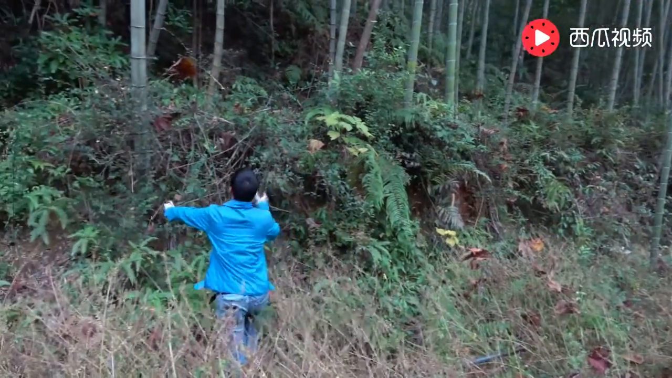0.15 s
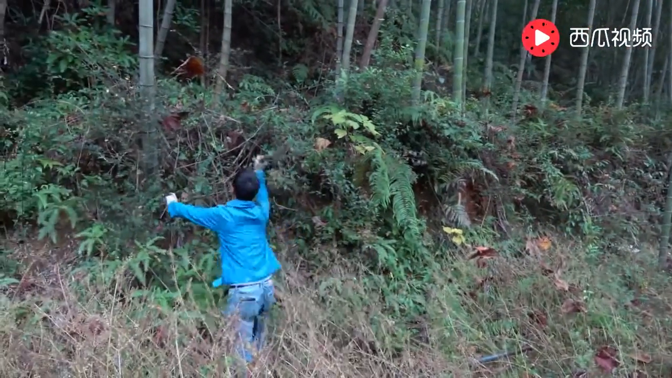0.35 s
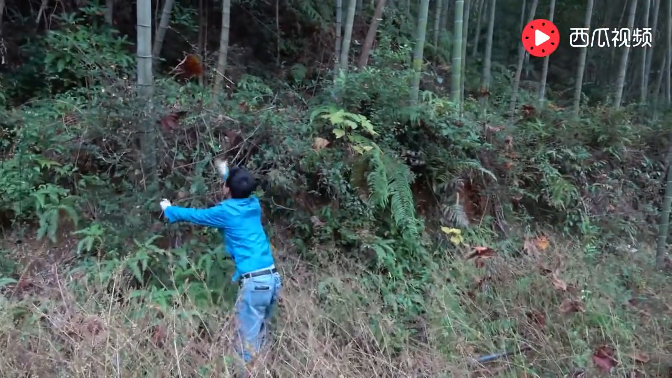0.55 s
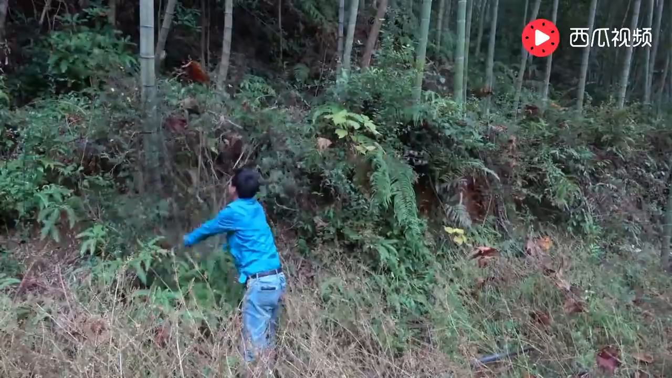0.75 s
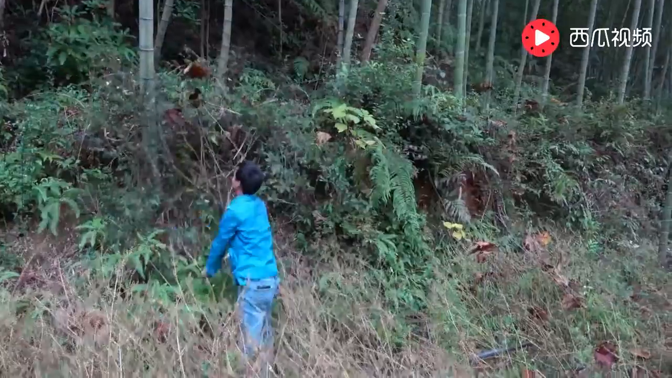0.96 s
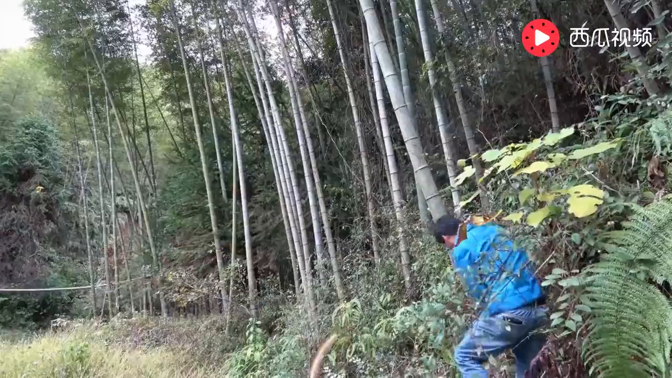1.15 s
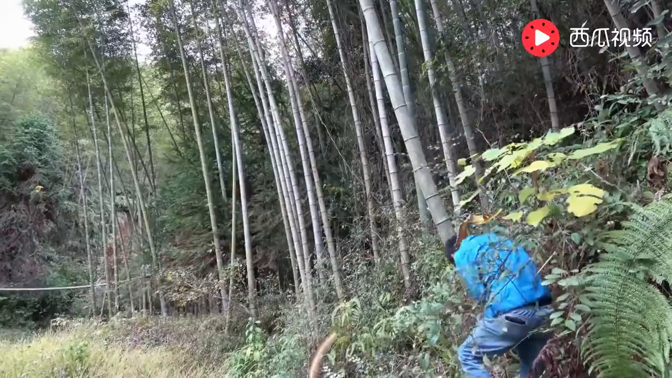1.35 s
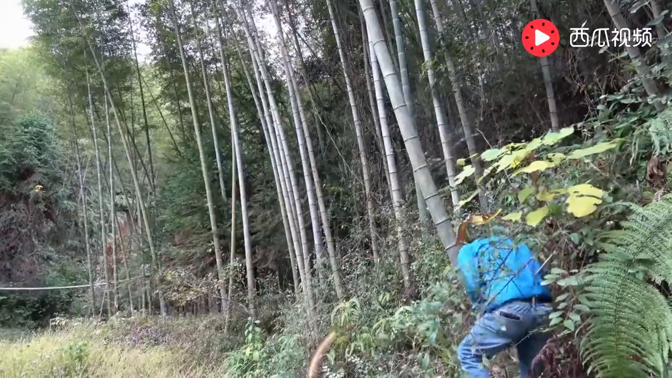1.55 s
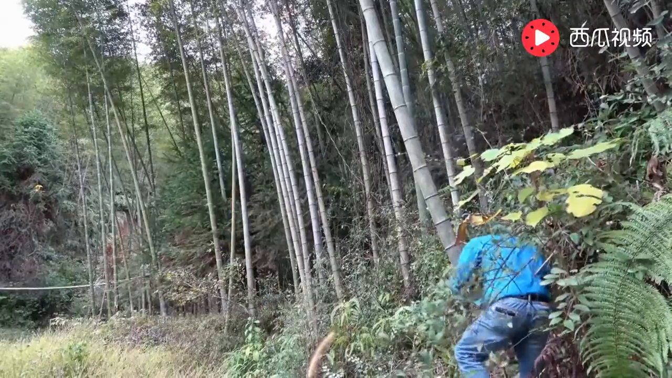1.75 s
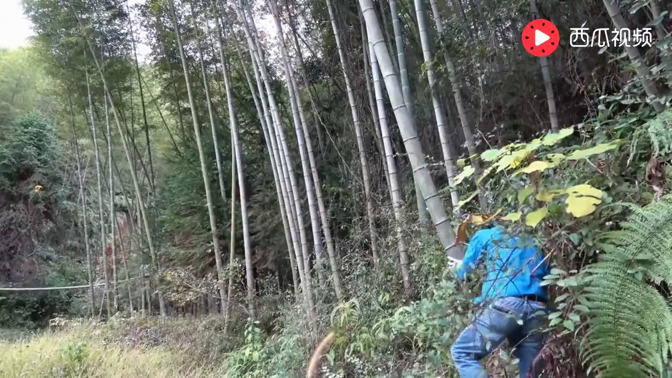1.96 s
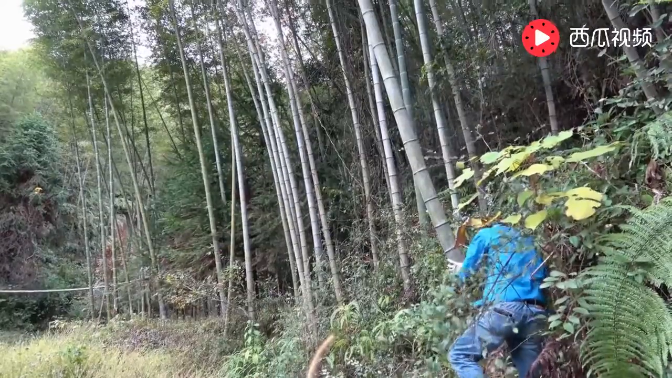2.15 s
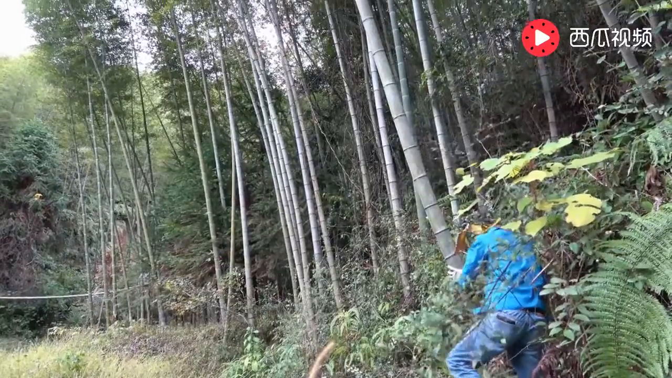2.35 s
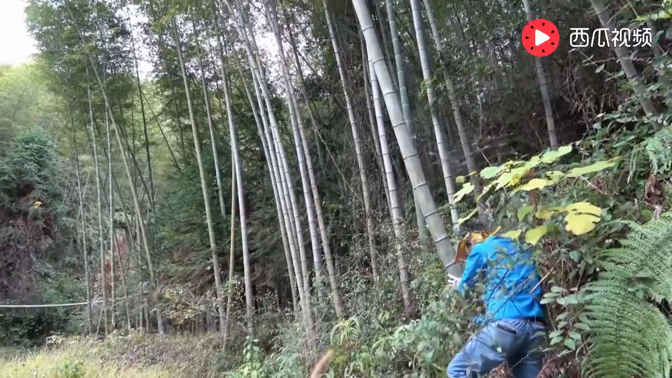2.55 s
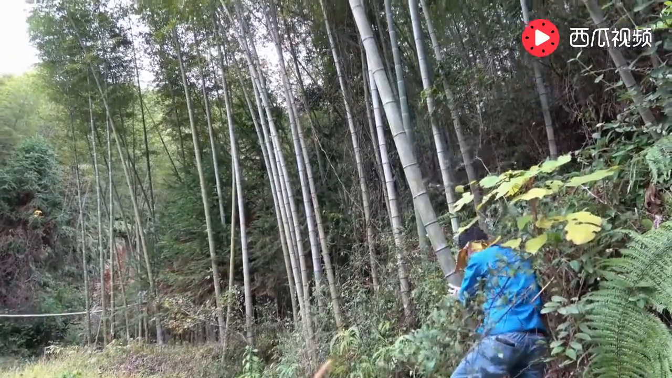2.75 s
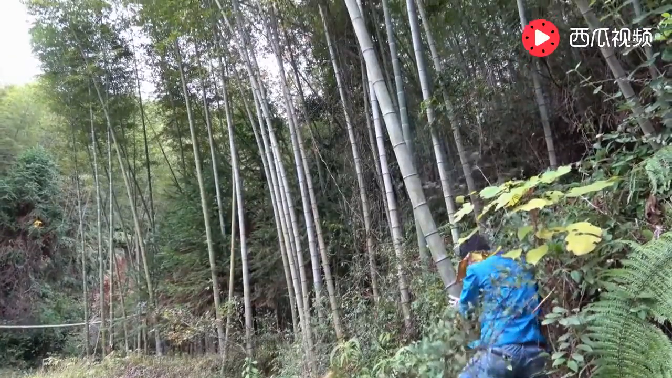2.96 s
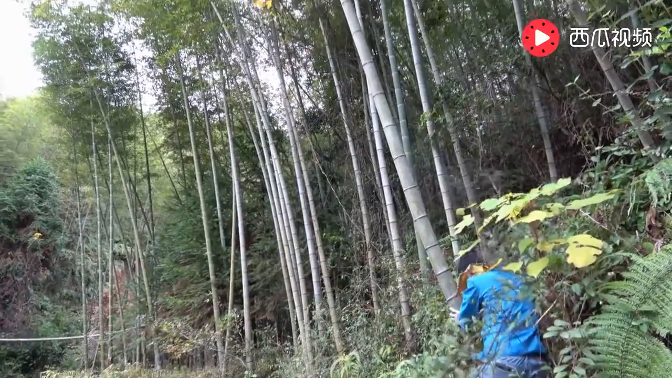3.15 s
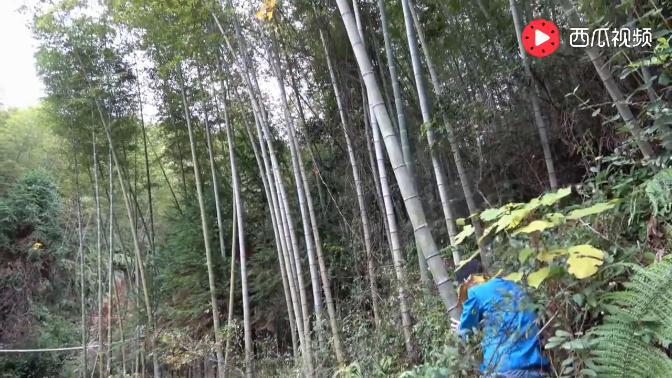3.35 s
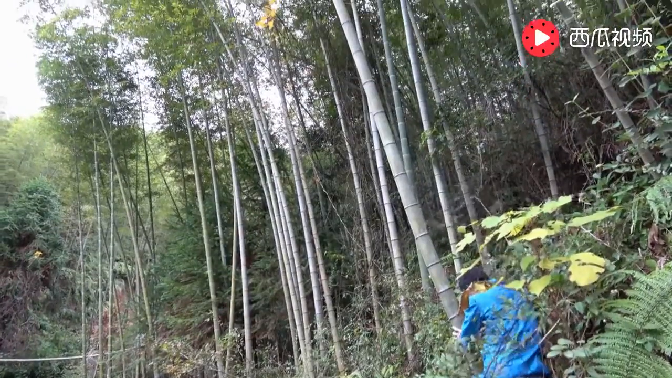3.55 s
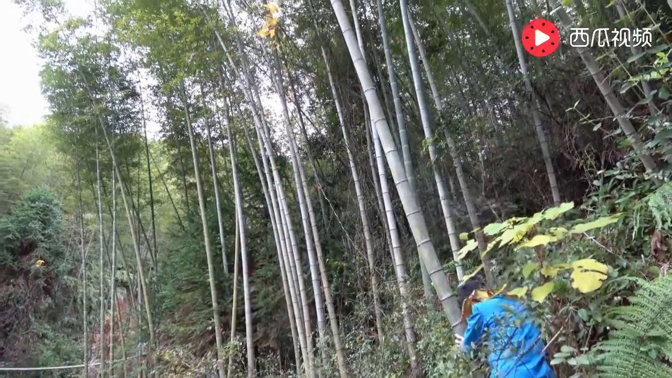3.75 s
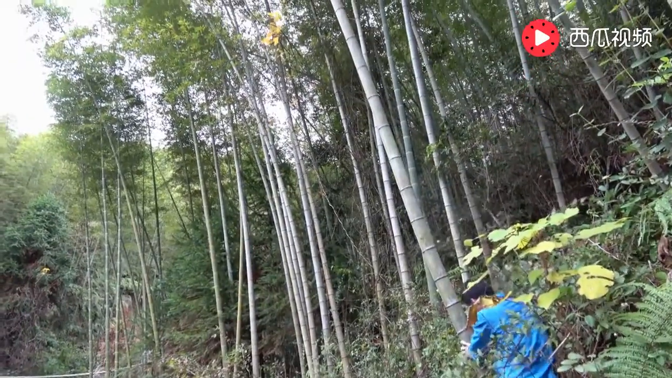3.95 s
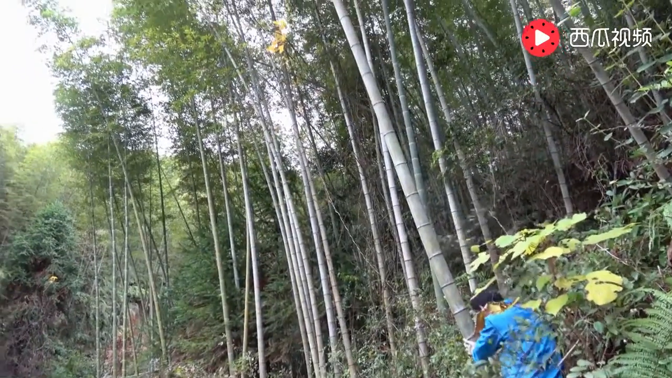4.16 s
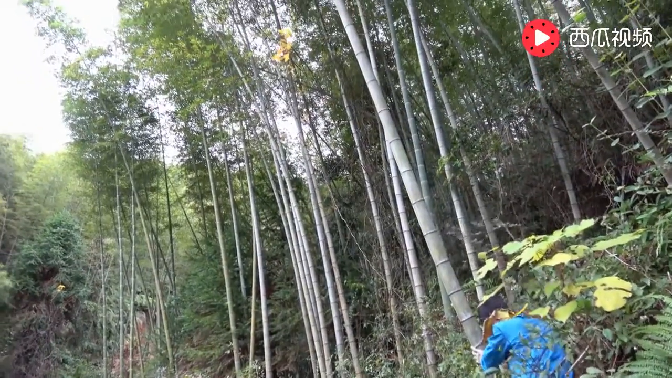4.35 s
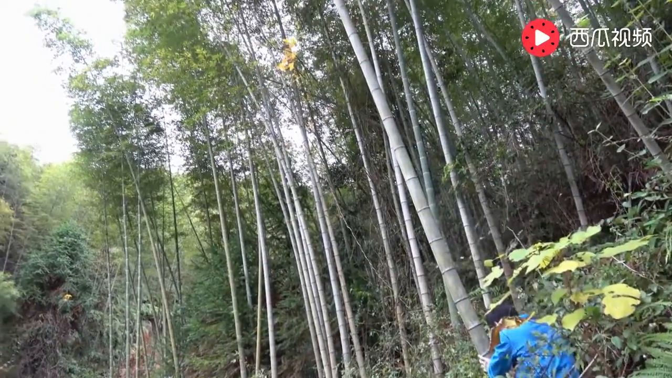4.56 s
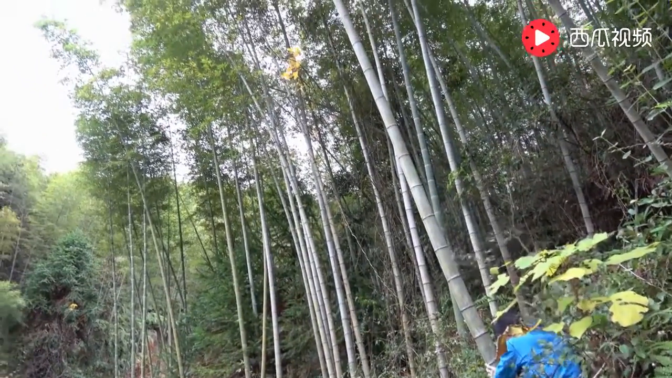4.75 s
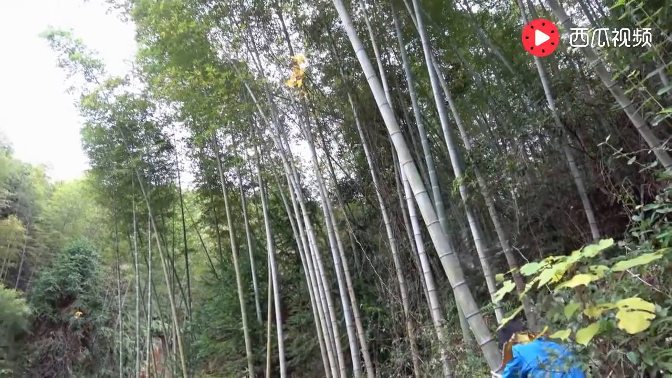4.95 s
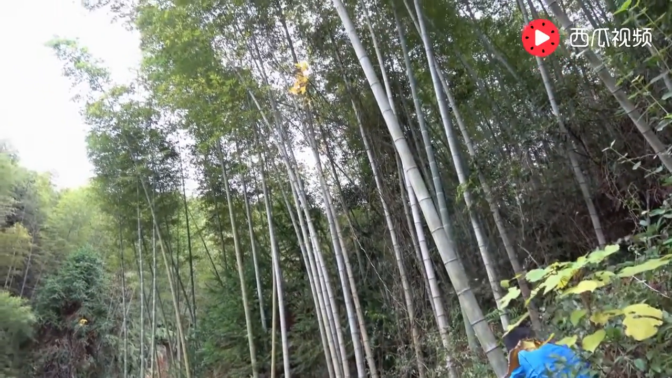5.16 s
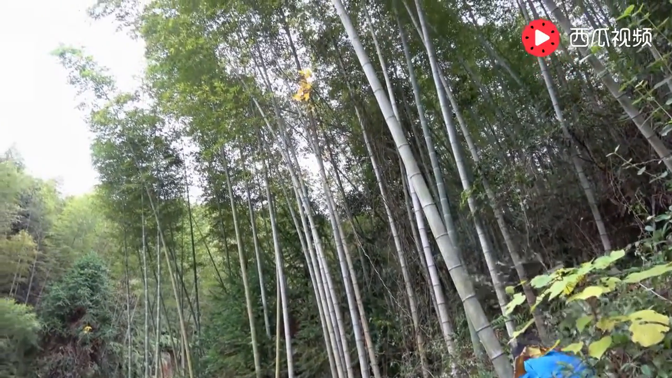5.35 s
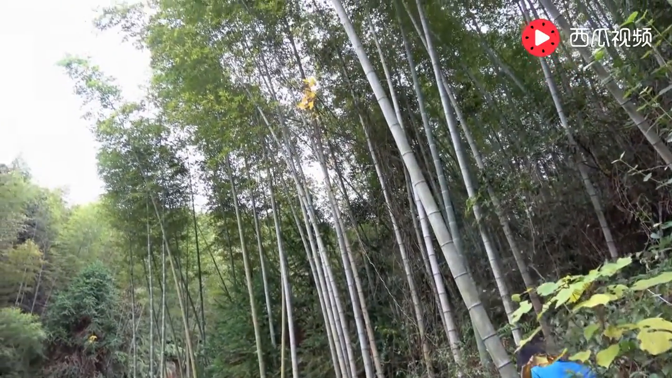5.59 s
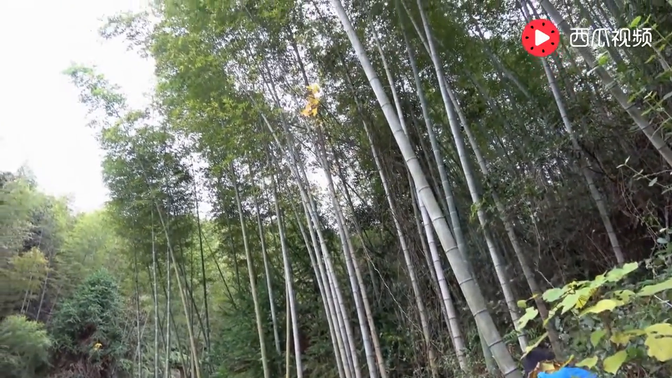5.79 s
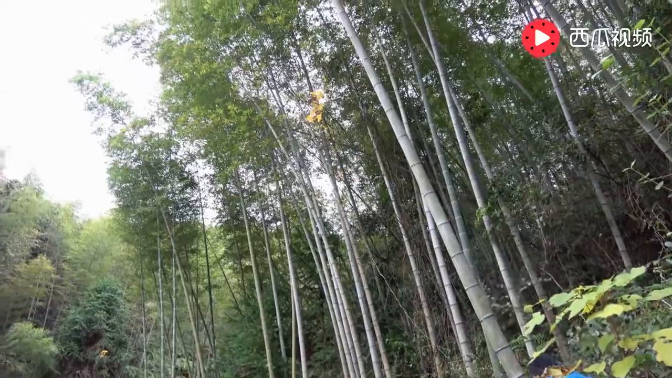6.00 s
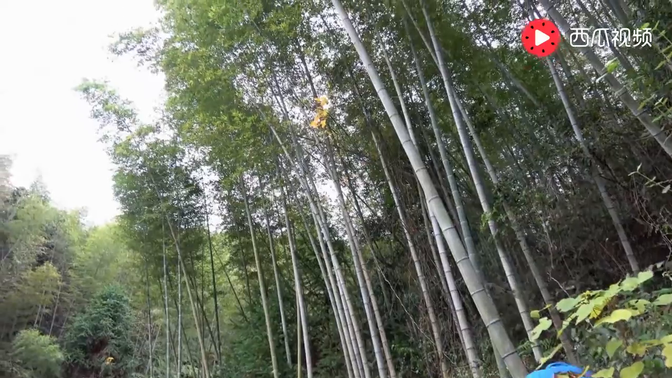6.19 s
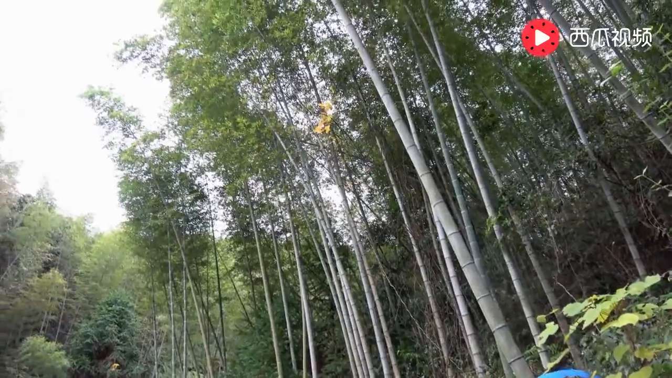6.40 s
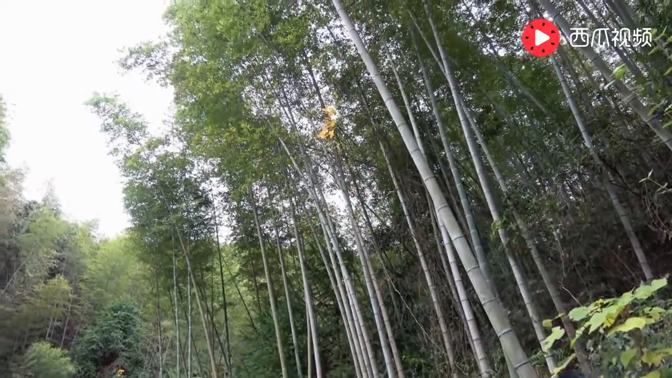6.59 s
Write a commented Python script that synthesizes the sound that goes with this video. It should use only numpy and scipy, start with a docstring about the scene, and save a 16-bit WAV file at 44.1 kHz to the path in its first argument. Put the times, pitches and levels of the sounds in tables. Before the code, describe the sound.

A blade slashes through brush and snaps twigs, then chops a hollow bamboo stem with sharp, evenly spaced knocks as leaves rustle.

```python
"""A thick bamboo stem is chopped in a grove. Each blow crunches the fibres, thumps, rings the hollow
stem and shakes the leaves and branches. Before the chopping, a blade slashes through brush and snaps
twigs, and the level dips briefly at about one second. Twigs keep ticking, the stems around echo the hits,
and at last the leafy top starts to swish down. A far rumble and a thin leaf hiss lie under it all."""
import sys
import numpy as np
from scipy import signal
from scipy.fft import rfft, irfft, next_fast_len
from scipy.io import wavfile
from scipy.ndimage import uniform_filter1d, map_coordinates

SR = 44100
rng = np.random.default_rng(int(sys.argv[2]) if len(sys.argv) > 2 else 0)


def generate_wav(sig):
    """Save sig (samples, or channels by samples) to the path in sys.argv[1] as 16-bit PCM at SR."""
    pcm = np.round(np.clip(np.atleast_2d(sig).T, -1, 1) * 32767).astype(np.int16)
    wavfile.write(sys.argv[1], SR, pcm)


N = 292383

# Blows on the stem: start_s, level_db, thump_db, note_db, note_delay_s, note_hz, shake_db, rattle_db,
# stir_db. Thump, note, shake and rattle are relative to level_db.
BLOWS = [(2.7732, -6.5, -2.5, -0.5, 0.025, 589, -26, -25, -33),
         (3.3526, -4, -10, -10.5, 0.026, 620.6, -23.5, -32, -40.5),
         (3.395, -17.5, 4.5, -4.5, 0.012, 525, -28.5, -43, -43),
         (3.893, -11, -3, -4, 0.019, 658, -11.5, -25, -39),
         (3.9356, -10.5, 1.5, -4.5, 0.022, 546, -24, -34, -34),
         (4.4714, -5, -6.5, -5, 0.0265, 564, -20, -30, -38.5),
         (5.015, -6, -11, -7.5, 0.021, 636, -14.5, -27.5, -37),
         (5.5691, -6, -6.5, -8.5, 0.025, 579, -19, -32.5, -44)]
# Steady stir of the brush: time_s, level_db, dryness_db (more is brighter), pan_db (left minus right)
BRUSH_STIR = [(0, -56.5, 0.5, -0.5), (.55, -48, 0.5, 2), (.68, -60, -4, -5), (.74, -55, 6, 0.5),
              (1.25, -54.5, -2, -2.5), (1.45, -48.5, -0.5, -4), (2.05, -50, -2, -3.5),
              (2.5, -51.5, -2, -3.5), (2.72, -52.5, -1, -4), (3.25, -50.5, -1, -4.5),
              (3.62, -42.5, 1.5, -1.5), (4.25, -46, .5, -4.5), (5.3, -43.5, 1, -2.5), (5.97, -46, 0, -3),
              (5.995, -56.5, 0, -7), (6.2, -45, 0, -8), (6.4, -36, -1, -8), (6.52, -34, 1.5, -8.5),
              (6.63, -39, 0, -8)]
# Tone of rustling leaves: pitch_hz, level_db
LEAF_TONE = [(88, -25), (150, -5), (303, -5.5), (398, -3), (649, -4), (871, -3), (1870, -4), (3490, -5.5),
             (9260, -10.5), (13400, -21), (16000, -28)]


def amp(db):
    """Turns decibels into a gain."""
    return 10 ** (np.asarray(db) / 20)


def unit(x):
    """Scales a signal to an average power of 1."""
    return x / np.sqrt(np.mean(x ** 2) + 1e-20)


def along(points, hz):
    """Reads between (pitch_hz, value) points on a log pitch axis."""
    pitches, values = np.transpose(points)
    return np.interp(np.log(hz + 1), np.log(pitches + 1), values)


def curves(rows):
    """One value per sample for each column after the time."""
    times, *columns = np.transpose(rows)
    return [np.interp(np.arange(N) / SR, times, column) for column in columns]


def wobble(rate):
    """A smooth random curve through rate points a second."""
    return map_coordinates(rng.standard_normal(int(N * rate / SR) + 4), [np.arange(N) * rate / SR])


def clumps(t, rate, depth_db):
    """A jerky gain, rate steps a second, for crunching and rattling."""
    steps = rng.standard_normal(int(len(t) * rate / SR) + 2)
    return unit(amp(depth_db * np.interp(t * rate, np.arange(len(steps)), steps)))


def filtered(x, response):
    """Gives each frequency the gain response(hz)."""
    n = x.shape[-1]
    padded = next_fast_len(n + 8192)
    return irfft(rfft(x, padded) * response(np.fft.rfftfreq(padded, 1 / SR)), padded)[..., :n]


def sides(pan_db):
    """Left and right gains for a level difference."""
    return np.array([amp(pan_db / 2), amp(-pan_db / 2)])


def add(track, start_s, sound):
    """Mixes a sound into a track."""
    i = round(start_s * SR)
    track[..., i:i + sound.shape[-1]] += sound[..., :track.shape[-1] - i]


def puff(t, tone):
    """Noise as long as t, shaped by (pitch_hz, level_db) points."""
    return unit(filtered(rng.standard_normal(len(t)), lambda hz: amp(along(tone, hz))))


def spread(pair, tone):
    """Blends two unrelated noises into stereo with the given tone."""
    # How alike left and right are: pitch_hz, likeness (1 is the same)
    alike = [(60, 0.99), (240, 0.86), (950, 0.94), (3770, 1), (15000, 0.69)]
    turn = lambda hz: np.arccos(np.clip(along(alike, hz), -1, 1)) / 2
    mid, side = filtered(pair, lambda hz: amp(along(tone, hz)) * [np.cos(turn(hz)), np.sin(turn(hz))])
    return unit(np.array([mid + side, mid - side]))


def rumble():
    """Far low noise in slow lumps, swelling a moment after each blow."""
    # Tone of the rumble: pitch_hz, level_db
    tone = [(12, -43), (20, -23.5), (114, 0), (219, -10.5), (369, -16), (422, -15.5), (560, -22),
            (700, -15), (910, -32), (1540, -120)]
    t, late_s, width_s = np.arange(N) / SR, 0.093, 0.074
    swell = np.max([np.exp(-.5 * ((t - blow[0] - late_s) / width_s) ** 2) for blow in BLOWS], axis=0)
    level_db = -50.5 + 5 * swell + 1.6 * wobble(2.56) + 3.55 * wobble(24)
    return amp(level_db) * spread(rng.standard_normal((2, N)), tone)


def brush_motion():
    """Level, dryness and pan of all the moving brush; louder rustles count for more."""
    # Single rustles: time_s, peak_db, rise_s, hold_s, fall_s, dryness_db, pan_db (rise and fall: 20 dB)
    rustles = [(0.203, -36, 0.41, .03, 0.37, 0.5, 1), (0.261, -33, .08, 0.048, 0.11, 5, -1),
               (0.383, -34, .15, .05, 0.13, -1.5, 0.5), (.768, -20, 0.01, 0.015, 0.12, 2.5, 0.5),
               (.835, -20.5, 0.1, 0.053, 0.042, 1, 0), (0.913, -31.5, .04, 0.096, 0.057, 1.5, 2),
               (1.058, -44.5, .03, .01, 0.25, -1.5, 3), (1.64, -40, 0.036, 0.009, 0.53, 1.5, -4),
               (2.173, -46, .15, 0.1, .15, 0, -5.5), (2.737, -31.5, .02, 0.022, .1, -1, -2),
               (3.025, -44, 0.034, 0.17, .2, 3.5, 0), (4.727, -43, 0.036, 0.016, 0.18, 1, 2)]
    # The arm swings through brush into a blow: peak_db, rise_s, hold_s, fall_s, dryness_db, pan_db
    swing = (-42, 0.26, 0.044, 0.07, 0.1, -8.5)
    # Brush stirred by a blow: rise_s, hold_s, fall_s, dryness_db, pan_db
    stir = (0.048, 0.048, 0.28, -1.4, 0.19)
    swings = [(blow[0], *swing) for before, blow in zip(BLOWS, BLOWS[1:]) if blow[0] - before[0] > .3]
    stirs = [(blow[0], blow[-1], *stir) for blow in BLOWS]
    t = np.arange(N) / SR
    level_db, dry_db, pan_db = curves(BRUSH_STIR)
    power = amp(2 * level_db)
    dry_sum, pan_sum = power * dry_db, power * pan_db
    for time_s, peak_db, rise, hold, fall, dryness, pan in rustles + swings + stirs:
        drop_db = 20 * np.maximum(0, np.maximum((time_s - t) / rise, (t - time_s - hold) / fall))
        part = amp(2 * (peak_db - drop_db))
        power, dry_sum, pan_sum = power + part, dry_sum + part * dryness, pan_sum + part * pan
    return 10 * np.log10(power), dry_sum / power, pan_sum / power


def leaves():
    """Patchy hiss with a crackle of single leaves in clumps; dry leaves sound brighter."""
    level_db, dry_db, pan_db = brush_motion()
    bands = signal.stft(rng.standard_normal((2, N)), nperseg=256)[2]
    patches = uniform_filter1d(uniform_filter1d(rng.standard_normal(bands.shape[1:]), 6, 0), 10, 1)
    hiss = unit(signal.istft(bands * amp(2 * unit(patches)), nperseg=256)[1][:, :N])
    flicks = (rng.random((2, N)) < .02 * amp(3.5 * wobble(25))) * rng.standard_normal((2, N))
    crackle = unit(flicks * amp(5.8 * rng.exponential(size=(2, N)).clip(0, 2.5)))
    rustle = spread(hiss + 0.3 * crackle, LEAF_TONE)
    low = filtered(rustle, lambda hz: 1 / (1 + (hz / 1800) ** 2))
    high = filtered(rustle, lambda hz: 1 - 1 / (1 + (hz / 7000) ** 2))
    tilted = amp(-2 * dry_db) * low + (rustle - low - high) + amp(2 * dry_db) * high
    return amp(level_db + .8 * wobble(30)) * sides(pan_db) * tilted


def grove_echo(hits):
    """Stems all round scatter the hits back, with a new echo every third of a second."""
    # Echoes among the stems: pitch_hz, fade_s (time to drop 60 dB)
    fades = [(200, 0.25), (1500, 0.17), (5000, 0.24), (12000, 0.16)]
    out, step = np.zeros((2, N)), SR // 3
    for i in range(0, N, step):
        hz, t, bands = signal.stft(rng.standard_normal((2, SR // 2)), SR, nperseg=256)
        tail = signal.istft(bands * amp(-60 * t / along(fades, hz)[:, None]), SR, nperseg=256)[1]
        tail = tail[:1] + 0.2 * tail * [[1], [-1]]  # nearly the same on both sides
        tail /= np.linalg.norm(tail[1])
        add(out, i / SR + .02, signal.fftconvolve(hits[None, i:i + step], tail, axes=1))
    return out


def twig_snaps():
    """Each twig gives a dry crack, a spray of splinters, a short ring and a duller knock."""
    # Twig snaps and blade ticks: start_s, level_db, pitch_hz, ring_db, knock_db
    snaps = [(0.0447, -23, 2586, -21, -24), (0.092, -24, 3080, -15, -28), (0.137, -25.5, 10200, -1.5, -32),
             (0.2143, -12.5, 4430, -5.5, -8.5), (0.3084, -10, 2750, -10, -15.5),
             (0.3211, -22.5, 1484, -21, -3.5), (0.382, -11.5, 8800, -13, -25),
             (0.4162, -13.5, 2950, -11, -5.5), (0.4461, -11.5, 1340, -10.5, -6.5),
             (0.4907, -21.5, 1440, -13, -10), (0.74, -10, 5800, 0, -39), (0.767, -13.5, 3010, -6, -36),
             (0.8783, -12.5, 3400, -9, -15), (0.889, -17, 3350, -8, -36), (0.9502, -20, 2500, -6.5, -23),
             (0.9801, -11.5, 1398, -8.5, -15), (1.3474, -24, 2880, -16, -39),
             (1.466, -16, 2190, -13.5, -14.5), (1.646, -20.5, 3960, -5.5, -40.5),
             (1.9616, -32, 1730, -3.5, -37), (2.206, -28, 1420, -7, -22), (2.7265, -14, 2840, -4, -48),
             (3.011, -22, 4040, -8, -25), (3.0293, -28, 1738, -9, -24.5), (3.0834, -26, 1515, -9, -31),
             (3.109, -28.5, 1580, -4, -31), (3.169, -17.5, 1530, 2, -42), (3.584, -25.5, 2620, -10, -14),
             (3.8778, -14, 3580, -7, -28), (3.8931, -4.5, 1510, -7.5, -34), (4.0244, -18, 1980, -5.5, -24),
             (4.4024, -24, 2240, -7, -14), (4.7208, -29, 3070, -5, -26), (4.947, -23.5, 3250, -8, -27),
             (5.2994, -26, 2850, -13, -29), (5.766, -29, 1510, -5, -18), (5.8202, -27.5, 2200, -10, -3.5),
             (5.879, -31.5, 1450, -8, -8), (6.5108, -22.5, 3450, -8, -16), (6.562, -14, 7960, -2, -40)]
    faint_ticks = [(when * N / SR, -32.5 - 6 * size, 1340 * 4 ** pitch ** 2, -7, -18)
                   for when, size, pitch in rng.random((18, 3))]
    out, t = np.zeros((2, N)), np.arange(SR // 5) / SR
    attack, fall = 1 - np.exp(-t / 0.00028), amp(-60 * t / .05)
    brush_pan_db = curves(BRUSH_STIR)[2]
    for start_s, level_db, hz, ring_db, knock_db in snaps + faint_ticks:
        pan_db = brush_pan_db[int(start_s * SR)] + 2.5 * rng.standard_normal()
        crack_tone = [(hz / 4, -30), (hz / 3.8, -3), (hz, 0), (hz * 1.94, -3), (hz * 5, -16)]
        crack = puff(t, crack_tone) * amp(-5 - 60 * t / 0.012)
        spray = puff(t, LEAF_TONE) * amp(-12) * fall
        tone = np.sin(2 * np.pi * hz * t) + .8 * np.sin(2 * np.pi * min(1.95 * hz, hz + 1400) * t)
        ring = amp(ring_db - 60 * t * hz / 200) * fall * tone  # thin twigs ring higher and shorter
        knock = amp(knock_db) * fall * puff(t, [(300, -23.5), (520, 2), (850, -4.5), (1500, -24)])
        snap = attack * (crack + spray + ring + knock)
        add(out, start_s, amp(level_db) * sides(pan_db)[:, None] * snap)
    return out


def branch_rattle(t):
    """Branches knock together just after a blow, in stereo."""
    # Ringing of the branches: pitch_hz, width_hz, level_db
    rings = [(584, 72, -13), (748, 79, -2), (1224, 160, -4), (1620, 210, 0.5), (2180, 440, -7.5),
             (2960, 1100, -9), (3800, 63, -8), (4910, 190, -9), (6500, 410, -15)]
    response = lambda f: sum(amp(db) / (1 + (2 * (f - hz) / width) ** 2) for hz, width, db in rings)
    swell = (t / 0.19) * np.exp(1 - t / 0.11) * clumps(t, 60.1, depth_db=4)
    mid, side = unit(filtered(rng.standard_normal((2, len(t))), response))
    return swell * np.array([mid + 0.068 * side, mid - 0.044 * side])


def leaf_shake(t):
    """A blow makes the leafy top shiver."""
    # Tone of the shaken top: pitch_hz, level_db
    tone = [(530, -38), (900, -12), (1550, -11), (1810, -8.5), (2660, 1.5), (3510, -3.5), (6330, -0.5),
            (13400, -14), (16000, -28)]
    shiver = (t / 0.036) ** 0.27 * np.exp(-(t / 0.067) ** 1.32) * clumps(t, 198, depth_db=2)
    return shiver * puff(t, tone)


def hollow_note(t, note_hz, delay_s):
    """A note runs back along the hollow stem, high pitches mostly first."""
    # Parts of the note: pitch_ratio (times note_hz), delay_ratio (times delay_s), level_db, width_s
    parts = [(1.32, 0.95, -13.5, 0.0074), (1.14, 0.71, -7, 0.0073), (.97, 1.096, 0.5, 0.004),
             (0.67, 1.57, -13.5, 0.006), (0.92, 1.85, -12.5, 0.005), (1.25, 1.23, -21, 0.011),
             (0.69, 3.1, -33, 0.0054)]
    note = np.zeros(len(t))
    for pitch_ratio, delay_ratio, level_db, width_s in parts:
        louder, detune, phase = rng.standard_normal(3)
        hz = note_hz * pitch_ratio * (1 + 0.019 * detune)
        age = t - delay_ratio * delay_s
        swell = amp(level_db + 0.96 * louder) * np.exp(-.5 * (age / width_s) ** 2)
        note += swell * np.sin(2 * np.pi * hz * (t - 4 * age ** 2) + 2 * phase)  # sags as it passes
    return note


def wall_ring(t):
    """The stem's wall rings, a little differently at each blow."""
    # Notes of the wall: pitch_hz, level_db, fade_s (time to drop 60 dB)
    notes = [(336.4, 0.5, 0.11), (750, 1, 0.14), (1190, 6, 0.03), (1430, -9, 0.083), (1632, -2.5, 0.055),
             (1920, -15, 0.078), (2560, -14, 0.028), (2950, -1, 0.068), (3400, -5, 0.044)]
    chance = rng.standard_normal((len(notes), 3))
    return sum(amp(db + louder - 60 * t / fade_s) * np.sin(2 * np.pi * hz * (1 + .022 * detune) * t + phase)
               for (hz, db, fade_s), (louder, detune, phase) in zip(notes, chance))


def thump(t):
    """The blade's push sinks in pitch, and the foot of the stem rocks in the soil."""
    cycles = 170 * (t + 0.0086 * (1 - np.exp(-t / 0.0071)))  # settles at 170 Hz
    push = np.sin(2 * np.pi * cycles) * amp(-60 * t / 0.042)
    sway = puff(t, [(25, -23), (60, 4.5), (120, 13.5), (300, 8), (450, -64)]) * amp(-10 - 60 * t / 0.21)
    return push + (1 - np.exp(-t / 0.0027)) * sway


def fibre_crunch(t):
    """Fibres split with a sharp crack and a ragged tail."""
    # Tone of splitting fibres: pitch_hz, level_db
    tone = [(410, -41), (700, -12), (1570, 3.5), (4320, -9), (5040, -9.5), (5730, -15), (9210, -22.5),
            (13400, -33), (15000, -64)]
    return puff(t, tone) * (amp(-60 * t / .022) + amp(-5.5 - 60 * t / .14) * clumps(t, 276, depth_db=-7))


def skin_cut():
    """The blade parts the outer skin just before it bites."""
    ramp = np.arange(380) / 380
    return ramp ** 2 * (1.2 - ramp) * puff(ramp, [(150, -24), (400, 6), (1500, -7), (9000, -32)])


def chops():
    """Each blow bites into the stem, sounds its hollow note and shakes its top and branches."""
    # The stem stands to one side: pitch_hz, pan_db
    stem_pan = [(60, -11), (150, -1.5), (380, -3), (950, -9), (2380, -7), (5980, -3.5), (15000, -0.5)]
    stem, branches, t = np.zeros(N), np.zeros((2, N)), np.arange(SR // 2) / SR
    attack = 1 - np.exp(-t / 0.001)
    for start_s, level_db, thump_db, note_db, delay_s, note_hz, shake_db, rattle_db, _ in BLOWS:
        bite = amp(-7) * fibre_crunch(t) + amp(-14.5) * wall_ring(t) + amp(thump_db) * thump(t)
        skin = skin_cut()
        add(stem, start_s - len(skin) / SR, amp(level_db - 6.5) * skin)
        add(stem, start_s, amp(level_db) * attack * bite)
        add(stem, start_s, amp(level_db + note_db) * hollow_note(t, note_hz, delay_s))
        for wait, pitch, size in rng.random((14, 3)):  # fibres split one by one with a short woody ring
            splinter = np.sin(2 * np.pi * 1000 * 4 ** pitch * t) * amp(-60 * t / 0.032)
            add(stem, start_s + .004 + .055 * wait, amp(level_db - 10.5 - 10 * wait - 4.9 * size) * splinter)
        add(stem, start_s, amp(level_db + shake_db) * leaf_shake(t))
        add(branches, start_s, amp(level_db + rattle_db) * branch_rattle(t))
    return filtered(stem, lambda hz: sides(along(stem_pan, hz))) + branches


def scene():
    """Chops and snaps with their echo, over the leaves and the rumble."""
    hits = chops() + twig_snaps()
    return hits + amp(-18.5) * grove_echo(hits.mean(0)) + leaves() + rumble()


def record(dry):
    """The level dips briefly, peaks are rounded off and the highest treble is cut."""
    # The brief dip: time_s, gain_db
    dip = [(.988, -1.5), (1.0, -19), (1.04, -38), (1.048, -28), (1.062, -2.5)]
    dipped = dry * amp(curves(dip)[0])
    rounded = dipped / (1 + np.abs(dipped / .7) ** 4) ** .25
    return filtered(rounded, lambda hz: hz < 15300)


dry = scene()
out = record(dry)
generate_wav(out)
```